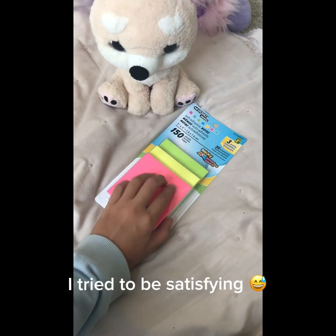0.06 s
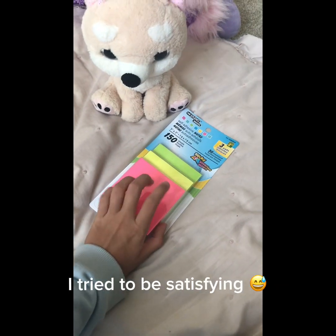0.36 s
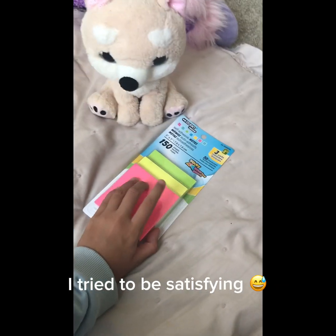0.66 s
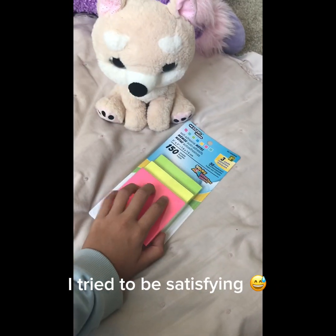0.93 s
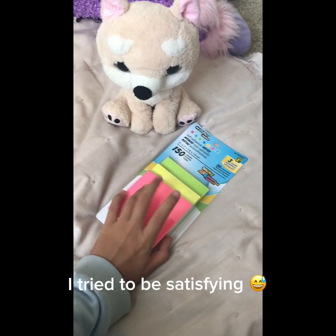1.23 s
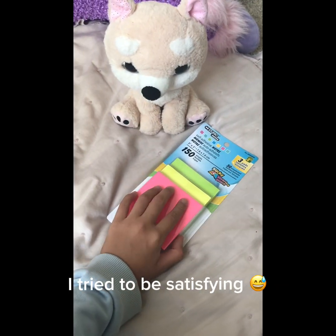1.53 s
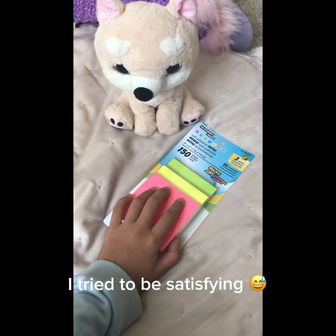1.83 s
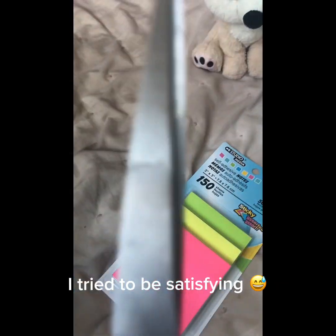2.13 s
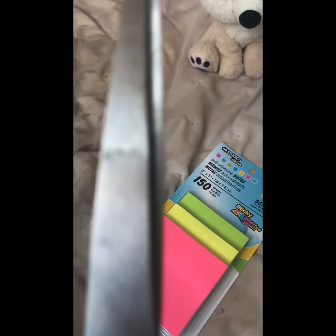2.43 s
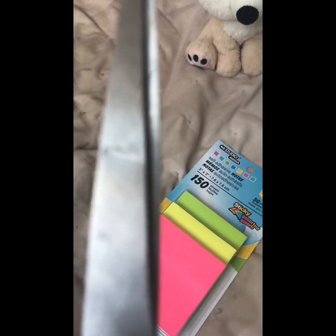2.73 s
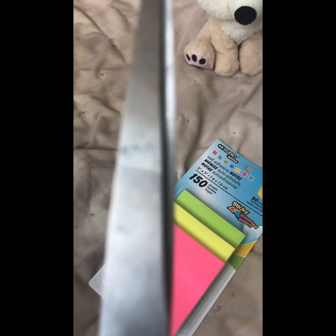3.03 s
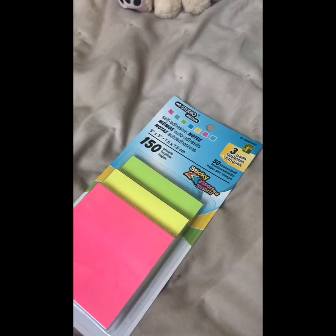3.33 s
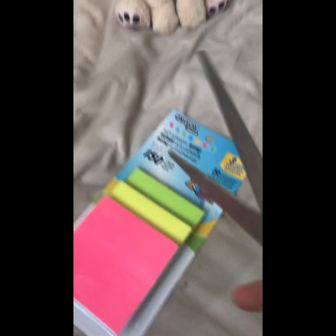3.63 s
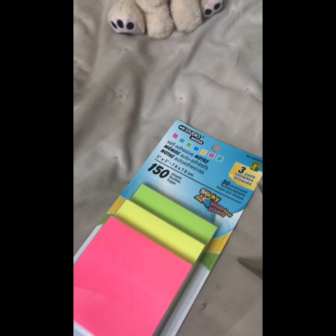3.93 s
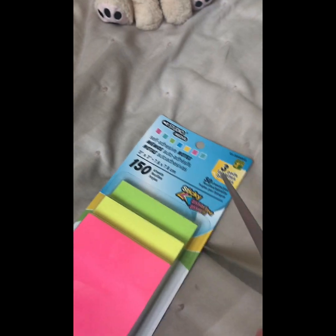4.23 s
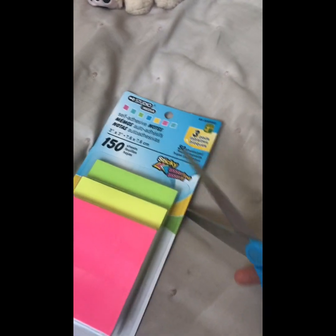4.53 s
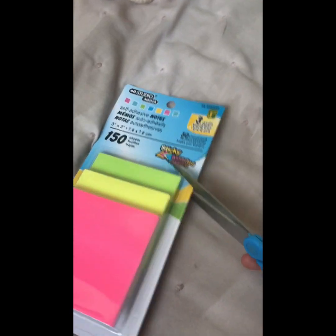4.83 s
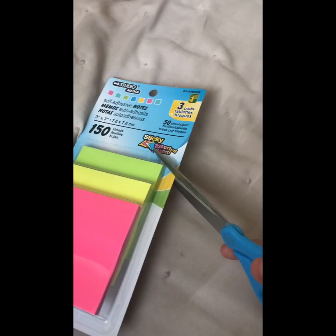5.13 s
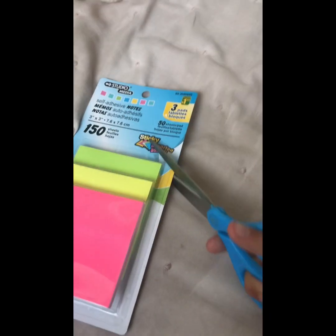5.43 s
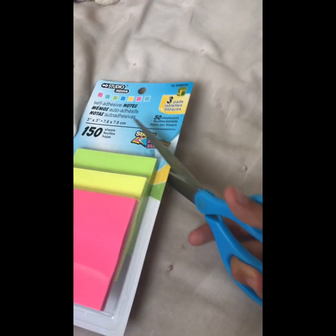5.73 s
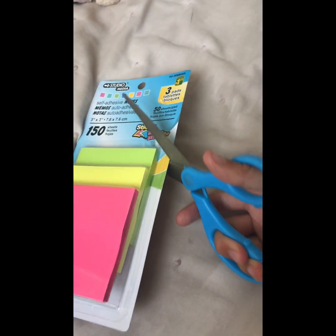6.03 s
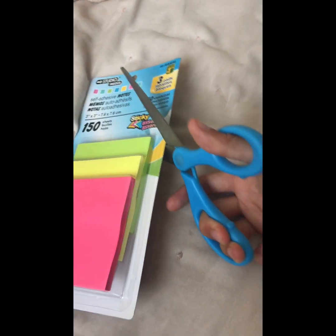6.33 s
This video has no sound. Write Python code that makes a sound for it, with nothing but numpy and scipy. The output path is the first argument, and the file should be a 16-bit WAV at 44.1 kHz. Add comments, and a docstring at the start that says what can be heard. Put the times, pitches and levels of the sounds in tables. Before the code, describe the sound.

Fingertips tap lightly on a plastic-fronted card packet lying on a bed. Close to the microphone, scissors scrape open with a tiny squeak and a clack, then clack again. A sleeve brushes the bedding, the blades knock the packet, and they bite through it in one quick run of sharp cracks. A few soft ticks follow. Faint room tone and handling rumble lie underneath, and the sound cuts out twice for an instant.

```python
"""Over faint room tone, fingertips tap a plastic-fronted card packet on a bed; a hand rumbles on the
microphone. Close by, scissors scrape open with a squeak and clack, steel on steel. The blades nudge the packet
and glide over it while a sleeve brushes the bedding, then bite through in a quick run of cracks that ring the
blades and the card. Twice the sound drops out for an instant."""
import sys
import numpy as np
from scipy import signal
from scipy.fft import rfft, irfft
from scipy.io import wavfile
from scipy.ndimage import uniform_filter1d

SR = 44100
rng = np.random.default_rng(int(sys.argv[2]) if len(sys.argv) > 2 else 0)


def generate_wav(signal):
    """Clip the signal to [-1, 1] and save it as 16-bit WAV at the path in sys.argv[1]."""
    frames = np.transpose(np.atleast_2d(signal))
    scaled = np.clip(frames, -1, 1) * 32767
    pcm = np.round(scaled).astype(np.int16)
    wavfile.write(sys.argv[1], SR, pcm)


N = 289913
TIME_S = np.arange(N) / SR
RING_S = TIME_S[:SR // 4]


def amp(db):
    return 10 ** (np.asarray(db) / 20)


def unit_rms(x):
    return x / np.sqrt(np.mean(x ** 2) + 1e-20)


def at_hz(points, hz):
    """Table lookup on a log-frequency axis."""
    point_hz, value = np.transpose(points)
    return np.interp(np.log(hz + 1), np.log(point_hz), value)


def add(mix, start_s, sound):
    part = mix[round(start_s * SR):][:len(sound)]
    part += sound[:len(part)]


def coloured(x, spectrum):
    """Filter by (frequency [Hz], level [dB]) points; rms 1."""
    gain = amp(at_hz(spectrum, np.fft.rfftfreq(len(x), 1 / SR)))
    return unit_rms(irfft(rfft(x) * gain, len(x)))


def noise(spectrum):
    return coloured(rng.standard_normal(N), spectrum)


def soften(x, corner_hz):
    """Low-pass, as by a blunt contact."""
    return signal.lfilter(*signal.butter(2, corner_hz, fs=SR), x)


def flicker(corner_hz):
    return unit_rms(soften(rng.standard_normal(N), corner_hz))


def decay(t60_s):
    return np.exp(-np.log(1000) * RING_S / t60_s)


def swell(middle_s, length_s):
    return np.exp(-np.pi * ((TIME_S - middle_s) / length_s) ** 2)


def ring(modes, spread_db, detune):
    """Damped modes of alternating sign, slightly varied per blow."""
    out = np.zeros(len(RING_S))
    for k, (hz, db, t60_s) in enumerate(modes):
        gain = (-1) ** k * amp(db + spread_db * rng.uniform(-1, 1))
        tuned_hz = hz * (1 + detune * rng.uniform(-1, 1))
        out += gain * decay(t60_s) * np.cos(2 * np.pi * tuned_hz * RING_S)
    return out


# room tone spectrum: (frequency [Hz], level [dB])
AIR_SPECTRUM = [(15, -48), (28, -28), (60, -7.5), (97, 0), (140, -6.5), (190, -6), (235, -14.5),
                (290, -7.5), (370, -20), (480, -22), (620, -27), (1250, -27.5), (1500, -35.5),
                (2400, -36.5), (7000, -43), (10500, -45.5), (12500, -42.5), (16000, -45.5)]


def room_tone():
    """Steady, mostly low noise."""
    return amp(-59) * noise(AIR_SPECTRUM)


# surface tick spectrum: (frequency [Hz], level [dB])
TICK_SPECTRUM = [(200, -21), (1000, -13), (2500, 1), (4000, -4), (7000, 1.5), (10300, -6), (12500, -2),
                 (16000, -3.5)]


def tick(t60_s, fizz_db, fizz_t60_s):
    """A sharp break, then a fading fizz."""
    burst = rng.choice([-1, 1], len(RING_S)) * (decay(t60_s) + amp(fizz_db) * decay(fizz_t60_s))
    burst[0] = amp(6.5)
    hz = np.linspace(0, SR / 2, 65)
    colour = signal.firwin2(33, hz, amp(at_hz(TICK_SPECTRUM, hz)), fs=SR)
    return signal.lfilter(colour[10:], 1, burst)


def touches(events, modes, contact_hz):
    """Each touch knocks the packet and ticks its surface."""
    out = np.zeros(N)
    for time_s, knock_db, tick_db in events:
        add(out, time_s, amp(knock_db) * soften(ring(modes, spread_db=4, detune=0.027), contact_hz))
        add(out, time_s, amp(tick_db) * tick(t60_s=0.0013, fizz_db=-12.5, fizz_t60_s=0.011))
    return out


# fingertip taps: (time [s], knock [dB], tick [dB])
FINGER_TAPS = [(.057, -43, -40), (.0748, -39, -34), (.229, -61, -55.5), (.4801, -53.5, -43),
               (.6365, -57, -45), (.6648, -51.5, -44.5), (.7078, -54, -44), (.7974, -46.5, -37.5),
               (1.2974, -51.5, -48), (1.3289, -60, -41.5), (1.4746, -44.5, -39)]
# plastic blister modes: (frequency [Hz], level [dB], t60 [s])
BLISTER_MODES = [(255, -4.5, 0.056), (428, -5, 0.041), (622, -10.5, 0.014), (1060, -2, 0.017),
                 (1230, -2, 0.017), (1416, -1, 0.016), (2420, -3.5, 0.0076)]


def finger_taps():
    """Fingertips ring the plastic blister."""
    return touches(FINGER_TAPS, BLISTER_MODES, contact_hz=2100)


def swing(start_s, peak_db, rise_db_per_s, stop_s=2.152, release_s=0.003):
    """Friction grows as the opening blades speed up and dies when they stop."""
    left_s = stop_s - TIME_S
    rise = amp(peak_db - rise_db_per_s * np.maximum(left_s, 0))
    release = np.exp(np.minimum(left_s, 0) / release_s)
    return (TIME_S > start_s) * rise * release


# edge friction spectrum: (frequency [Hz], level [dB])
RASP_SPECTRUM = [(700, -7), (1800, -5), (2600, -5), (5000, 1.5), (7000, -0.5), (10500, -4), (13500, -2),
                 (16000, -0.5)]


def blade_scrape():
    """Edge drags over edge in tiny slips; a squeak climbs with speed, then holds."""
    slips = rng.standard_normal(N) * amp(6.1 * rng.standard_normal(N))
    rasp = swing(start_s=2.025, peak_db=-51.5, rise_db_per_s=155) * coloured(slips, RASP_SPECTRUM)
    squeak_s, low_hz, top_hz, climb_hz_per_s = 2.118, 10200, 13600, 170000
    hz = np.clip(low_hz + climb_hz_per_s * (TIME_S - squeak_s), low_hz, top_hz)
    hz *= 1 + 0.034 * flicker(corner_hz=890)
    squeak = np.sin(2 * np.pi * np.cumsum(hz) / SR)
    return rasp + swing(squeak_s, peak_db=-48.5, rise_db_per_s=260) * squeak


# hand-held blade resonances: (frequency [Hz], width [Hz], level [dB])
STEEL_MODES = [(4070, 330, -6), (4360, 370, 2), (5260, 320, -5), (6070, 400, -15), (8830, 620, -10),
               (9800, 490, -11.5), (13100, 1300, -11), (15000, 1000, -9)]


def steel(drive):
    """The narrow blades colour the drive and radiate little below their resonances."""
    body = sum(amp(db) * width_hz * np.exp(-np.pi * width_hz * RING_S) * np.cos(2 * np.pi * hz * RING_S)
               for hz, width_hz, db in STEEL_MODES)
    body = signal.lfilter(*signal.butter(7, 3600, "high", fs=SR), body)
    return signal.oaconvolve(drive, body / np.linalg.norm(body))[:N]


# blade-on-blade hits: (time [s], chatter [dB], chatter t60 [s], bending [dB])
BLADE_HITS = [(2.0292, -44, 0.0077, -78), (2.1393, -39.5, 0.016, -46), (2.1433, -40, 0.016, -44.5),
              (2.151, -38.5, 0.0087, -63), (2.168, -60, .006, -75), (3.3235, -34, 0.029, -70),
              (3.328, -28, 0.0098, -44.5), (3.331, -41, 0.015, -58)]
# bending modes, damped by the grip: (frequency [Hz], level [dB], t60 [s])
BENDING_MODES = [(1004, -6.5, 0.012), (1625, -6, 0.03), (1850, -1.5, 0.028)]


def blade_clacks():
    """The blades chatter briefly where they meet, and flex."""
    chatter, flex = np.zeros(N), np.zeros(N)
    for time_s, chatter_db, t60_s, bend_db in BLADE_HITS:
        add(chatter, time_s, amp(chatter_db) * decay(t60_s) * rng.choice([-1, 1], len(RING_S)))
        add(flex, time_s, amp(bend_db) * ring(BENDING_MODES, spread_db=2, detune=0.02))
    return steel(chatter) + flex


# blade-on-card touches: (time [s], knock [dB], tick [dB])
BLADE_NUDGES = [(3.133, -58, -62), (4.206, -55, -57), (4.7604, -27, -36), (4.9446, -46.5, -45),
                (5.321, -58.5, -60), (5.356, -54.5, -57), (5.398, -52, -45), (5.401, -60, -43),
                (5.8492, -42.5, -60)]
# modes of the card on the bedding: (frequency [Hz], level [dB], t60 [s])
CARD_MODES = [(252.4, -6.5, 0.041), (502, -5, 0.036), (660, -6, 0.021), (808, -1.5, 0.018),
              (1225, -5, 0.022), (1422, -6, 0.018), (1720, -2.5, 0.013), (2290, -0.5, 0.0073)]


def blade_nudges():
    """The blades bump the card with dull knocks."""
    return touches(BLADE_NUDGES, CARD_MODES, contact_hz=1380)


# sleeve strokes: (start [s], length [s], swish [dB], hiss [dB], swish centre [Hz])
SLEEVE_STROKES = [(3.565, 0.58, -61.5, -68.5, 479.5), (4.29, 0.4, -74, -73, 801),
                  (5.302, .16, -65, -73.5, 854), (5.69, 0.66, -76.5, -72, 850), (6.46, 0.17, -74, -78, 900)]
# fibre hiss spectrum: (frequency [Hz], level [dB])
FIBRE_SPECTRUM = [(150, 12), (500, -2.5), (1200, 4), (2500, -0.5), (3400, 1), (5000, -2.5), (6500, -2),
                  (8000, -5.5), (10400, -7), (12000, -6), (16000, -7.5)]


def sleeve(attack_s=0.13, release_s=0.089, floor_from_s=3.55, floor_db=-76.5):
    """Cloth slides on bedding: a broad swish under the hiss of catching fibres."""
    catching = amp(1.1 * flicker(corner_hz=90))
    low_noise = noise([(150, 2.5), (350, -2.5), (900, -9), (2500, -15), (6000, -36)])
    swish = np.zeros(N)
    hiss_power = amp(floor_db) ** 2 * (TIME_S > floor_from_s)  # a faint steady hiss from here on
    for start_s, length_s, swish_db, hiss_db, centre_hz in SLEEVE_STROKES:
        age_s = TIME_S - start_s
        speed = np.clip(np.minimum(age_s / attack_s, (length_s - age_s) / release_s), 0, 1)
        swish += amp(swish_db) * speed * unit_rms(low_noise * np.cos(2 * np.pi * centre_hz * TIME_S))
        grab_db = 7.5 * swell(start_s + 0.086, length_s=0.22)  # the cloth pulls free
        hiss_power += (speed * amp(hiss_db + grab_db)) ** 2
    return catching * (swish + np.sqrt(hiss_power) * noise(FIBRE_SPECTRUM))


# blade glides: (middle [s], length [s], level [dB])
BLADE_GLIDES = [(4.262, .1, -66.5), (4.513, 0.12, -66.5), (6.07, 0.064, -69)]
# sliding steel spectrum: (frequency [Hz], level [dB])
GLIDE_SPECTRUM = [(500, -8), (2300, -2), (3300, 4), (5000, -4), (8000, -8), (9800, 0.5), (11200, -8),
                  (13000, 0), (16000, 0.5)]


def blade_glides():
    """The flat of a blade slides over the packet in short, airy swells."""
    envelope = sum(amp(db) * swell(middle_s, length_s) for middle_s, length_s, db in BLADE_GLIDES)
    return envelope * noise(GLIDE_SPECTRUM)


# breaks: (time [s], card [dB], place across the card [0-1], blade ring [dB], tick [dB])
PACKET_BREAKS = [(4.96, -23, 0.31, -25, -22), (4.979, -22, 0.3, -19.5, -24),
                 (5.014, -26.5, .45, -22, -17.5), (5.017, -49, .45, -35, -21), (5.018, -34, .45, -29, -29),
                 (5.0246, -27, 0.36, -18.5, -20), (5.0394, -24, 0.45, -20.5, -18),
                 (5.0683, -29, 0.35, -31, -25.5)]
# modes of the blades as they bite: (frequency [Hz], level [dB], t60 [s])
EDGE_MODES = [(2974, -2.5, 0.012), (3570, 3, 0.0074), (4520, -5.5, 0.0066), (5610, -10, .005),
              (6450, -2.5, 0.0016), (7500, -9.5, .005), (8700, -13, .004), (11800, 1, 0.0049),
              (14430, -10, .003)]


def packet_cracks():
    """The packet gives way in jerks: a sharp break, a ring of the blades, a flap of the whole card."""
    out = np.zeros(N)
    for time_s, card_db, place, edge_db, tick_db in PACKET_BREAKS:
        # a mode with a node at the break rings less
        modes = [(hz, db - 11 * np.cos(np.pi * (k + 1) * place) ** 4, t60_s)
                 for k, (hz, db, t60_s) in enumerate(CARD_MODES)]
        flap = soften(ring(modes, spread_db=0.5, detune=0.017), corner_hz=4500)
        add(out, time_s, amp(card_db) * flap)
        add(out, time_s, amp(edge_db) * ring(EDGE_MODES, spread_db=1, detune=0.008))
        add(out, time_s, amp(tick_db) * tick(t60_s=0.007, fizz_db=-11, fizz_t60_s=0.012))
    return out


# reverberation: (frequency [Hz], t60 [s])
ROOM_DECAY = [(200, .22), (1000, 0.27), (4000, 0.18), (9000, 0.18), (16000, 0.14)]
# nearby surfaces: (delay [s], level [dB])
REFLECTIONS = [(.0034, -21.5), (.0052, -22.5)]


def bedroom(x, wet_db):
    """Near reflections and a short, soft-furnished tail."""
    hz, time_s, bins = signal.stft(rng.standard_normal(SR // 2), SR, nperseg=256)
    fade = np.exp(-np.log(1000) * time_s / at_hz(ROOM_DECAY, hz)[:, None])
    tail = signal.istft(bins * fade, SR, nperseg=256)[1]
    response = np.zeros(SR)
    add(response, 0.006, amp(wet_db) * tail / np.linalg.norm(tail))
    for delay_s, db in REFLECTIONS:
        add(response, delay_s, amp([db]))
    return x + signal.oaconvolve(x, response)[:N]


# hand shifts: (middle [s], length [s], level [dB])
HAND_SHIFTS = [(0.065, 0.057, -56.5), (.28, 0.13, -61.5), (2.028, 0.13, -51), (2.176, 0.32, -54.5),
               (2.683, 0.23, -59), (3.133, 0.026, -49.5), (4.56, 0.19, -54.5), (5.31, 0.26, -57.5)]


def hand_rumble():
    """The holding hand shifts on the microphone, here and there under the whole scene."""
    grip = sum(amp(db) * swell(middle_s, length_s) for middle_s, length_s, db in HAND_SHIFTS)
    return grip * noise([(15, -18), (35, -9), (58, 2.5), (90, -9), (150, -10.5), (500, -36), (2000, -78)])


def scene():
    """Packet and blades in the room, over cloth, rumble and room tone."""
    packet = bedroom(finger_taps() + blade_nudges() + packet_cracks(), wet_db=-22)
    blades = bedroom(blade_clacks(), wet_db=-17) + blade_scrape()
    return (packet + blades + sleeve() + hand_rumble() + room_tone() + blade_glides())[None]


# silences: (start [s], end [s])
DROPOUTS = [(1.921, 1.9675), (3.154, 3.2)]


def record(dry):
    """Two brief dropouts, a dull pop as the first ends, then a low-pass."""
    gate = np.ones(N)
    for start_s, end_s in DROPOUTS:
        gate[(TIME_S > start_s) & (TIME_S < end_s)] = 0
    out = dry[0] * uniform_filter1d(gate, size=24)
    pop_s, pop_db, cutoff_hz = 1.9683, -42, 16100
    add(out, pop_s, -amp(pop_db) * decay(t60_s=0.012))
    low_pass = signal.firwin(255, cutoff_hz, window=("kaiser", 9), fs=SR)
    return signal.oaconvolve(out, low_pass, "same")[None]


dry = scene()
out = record(dry)
generate_wav(out)
```